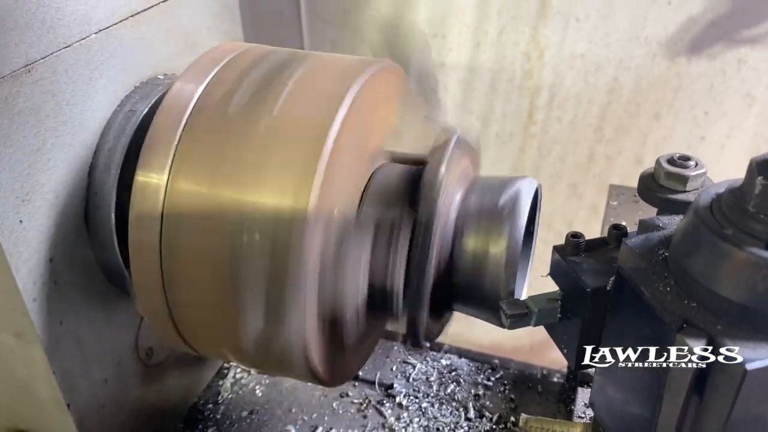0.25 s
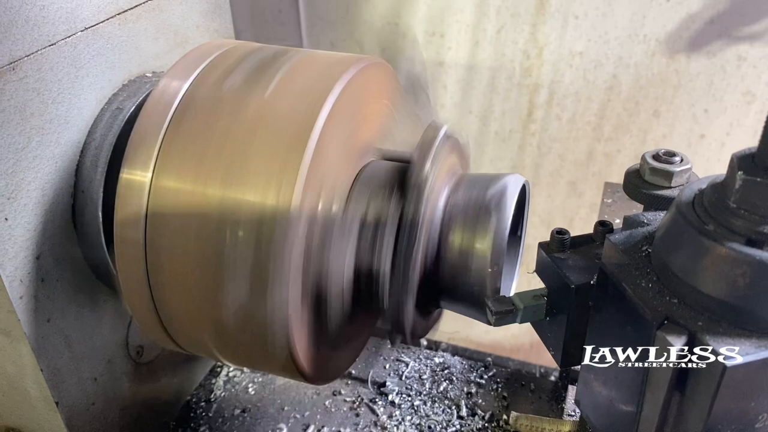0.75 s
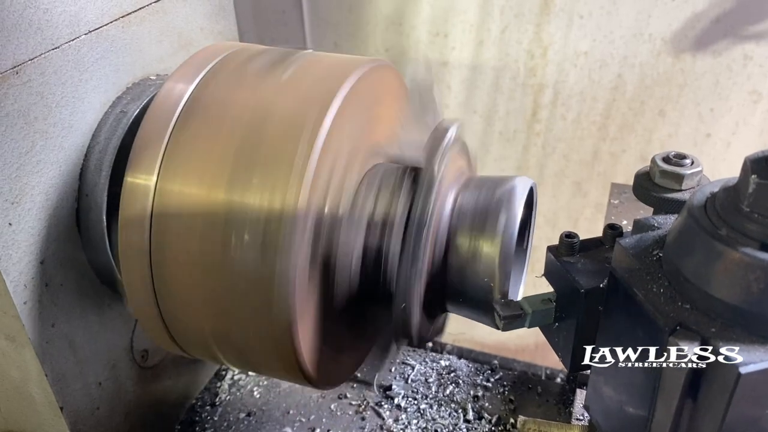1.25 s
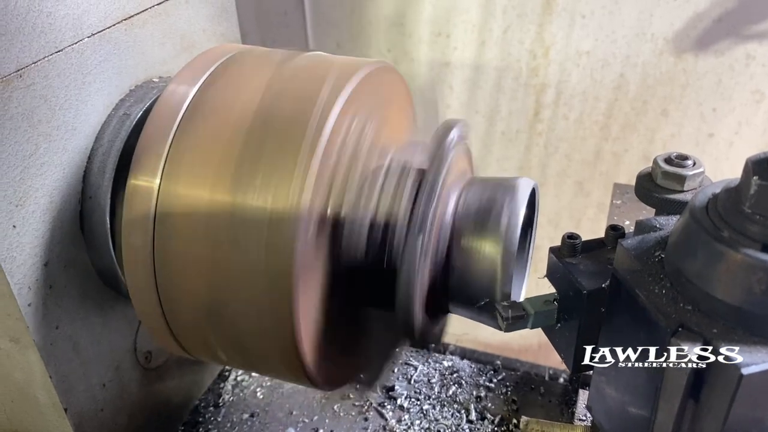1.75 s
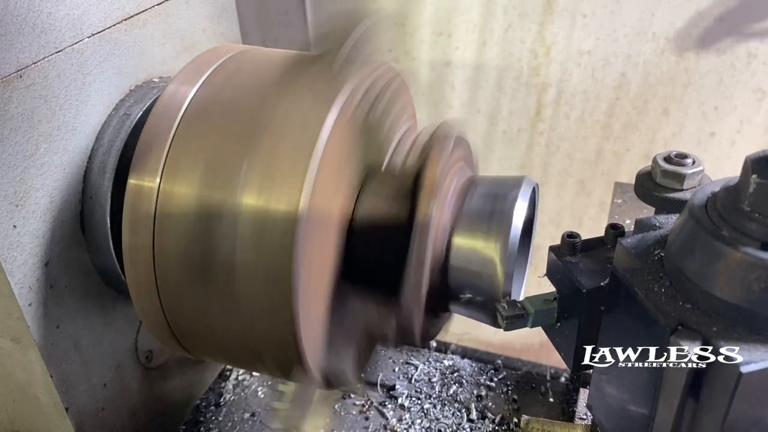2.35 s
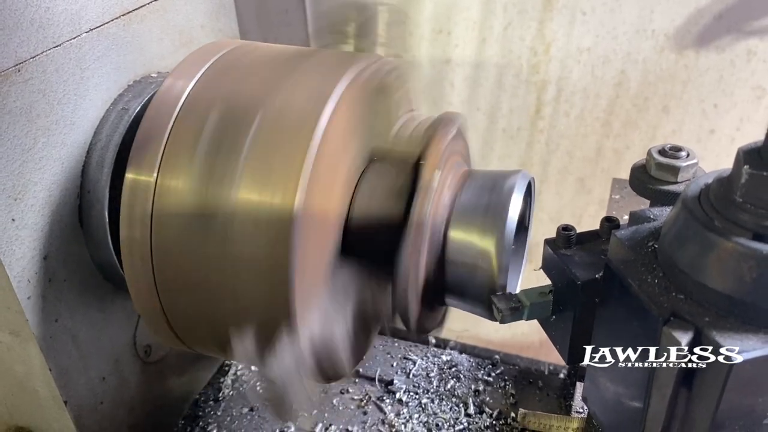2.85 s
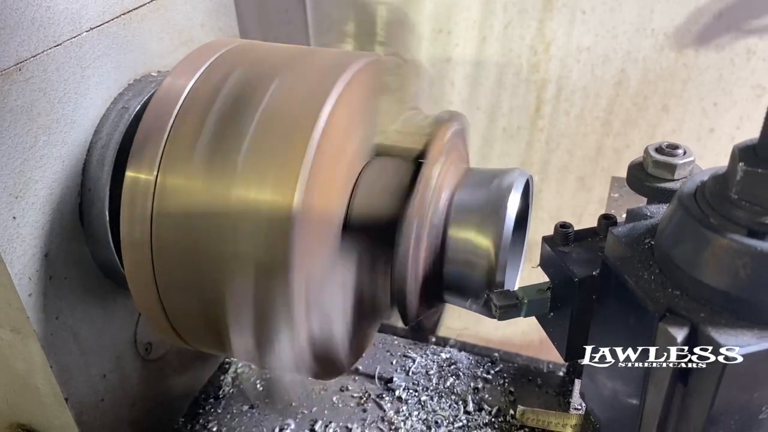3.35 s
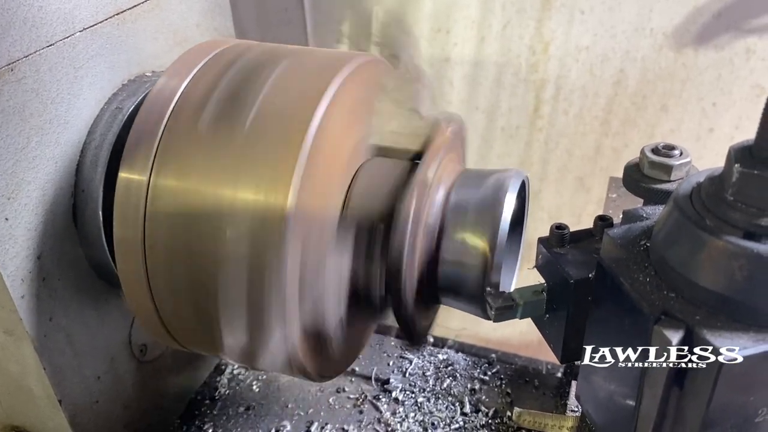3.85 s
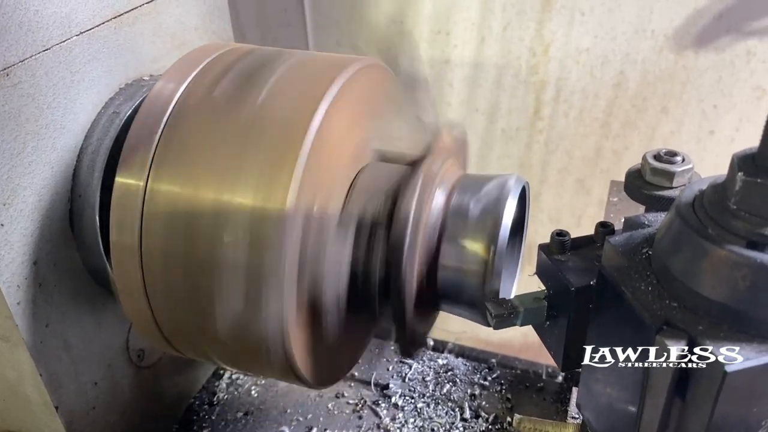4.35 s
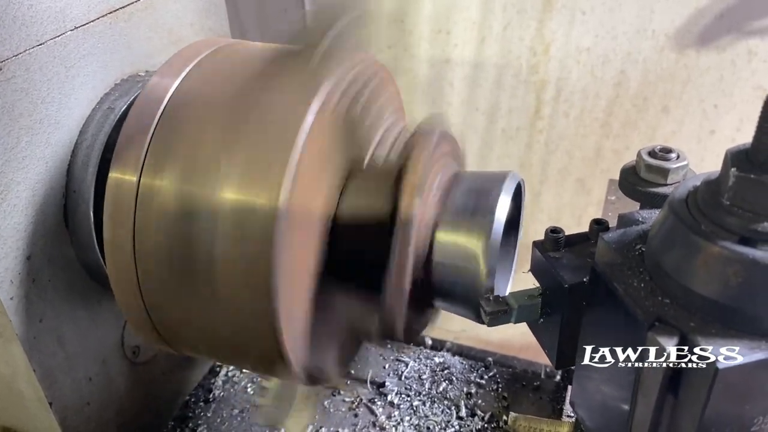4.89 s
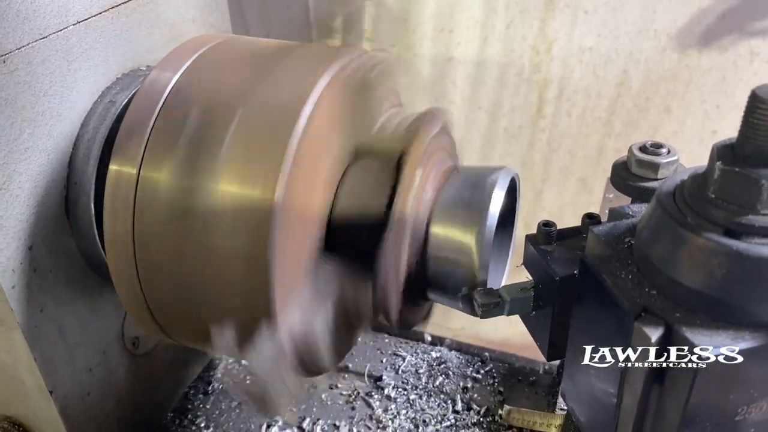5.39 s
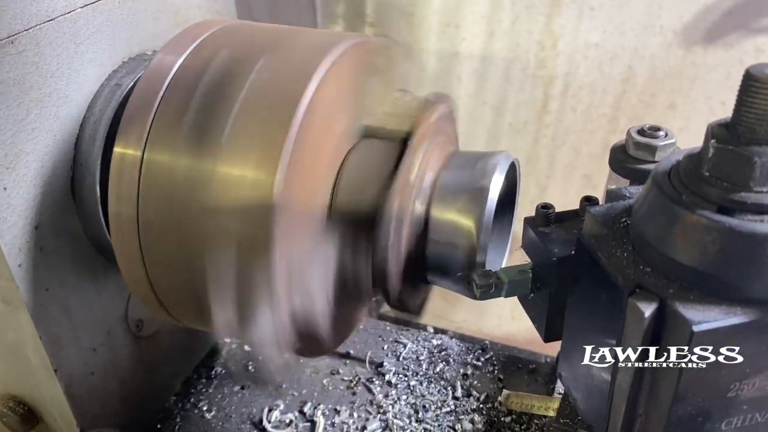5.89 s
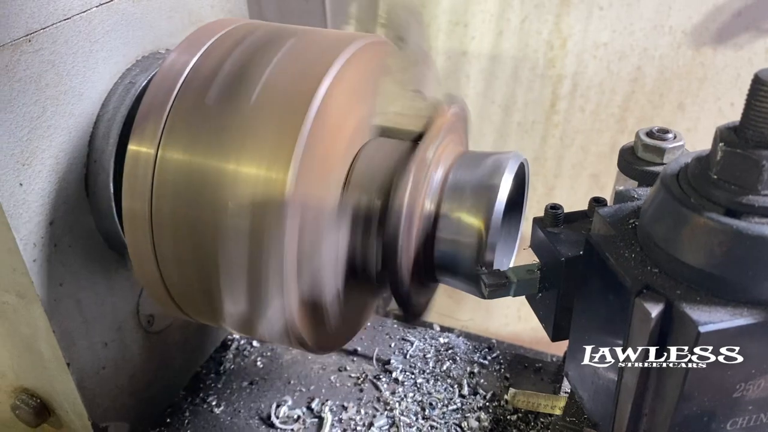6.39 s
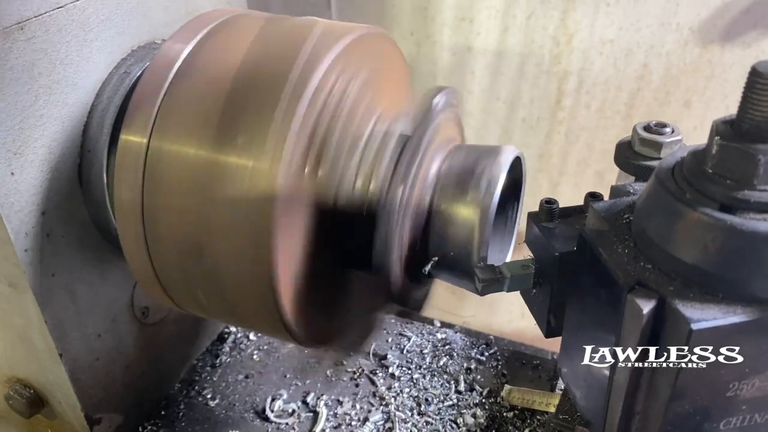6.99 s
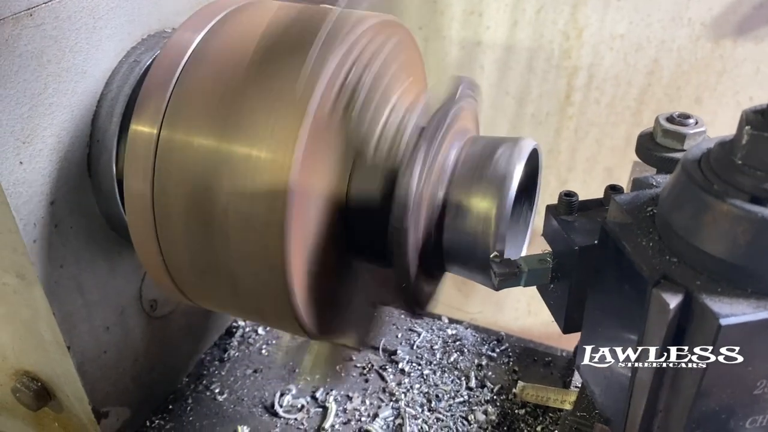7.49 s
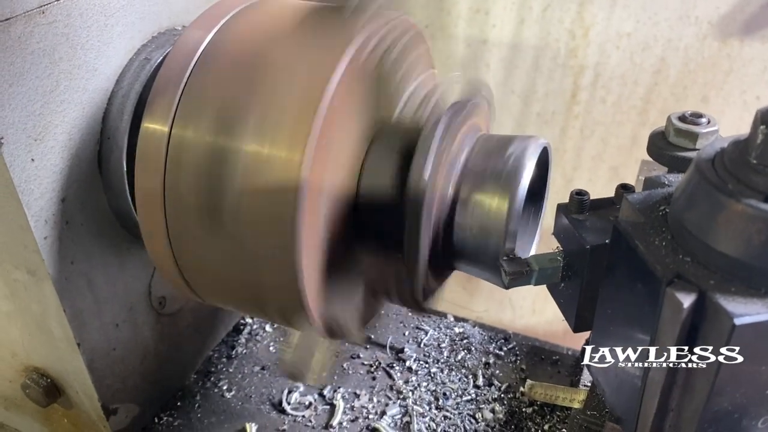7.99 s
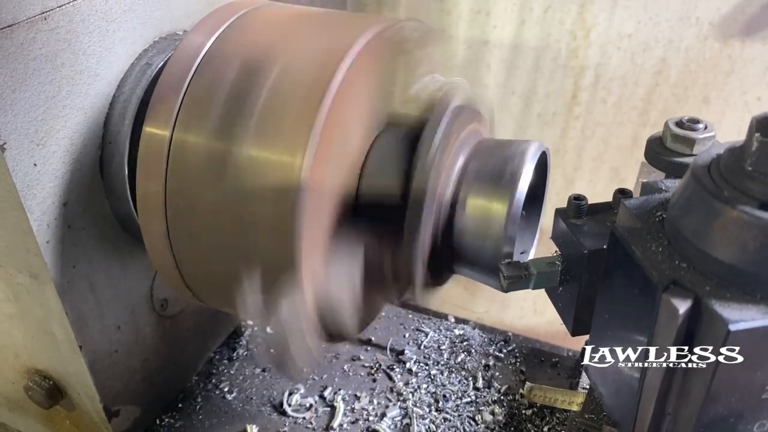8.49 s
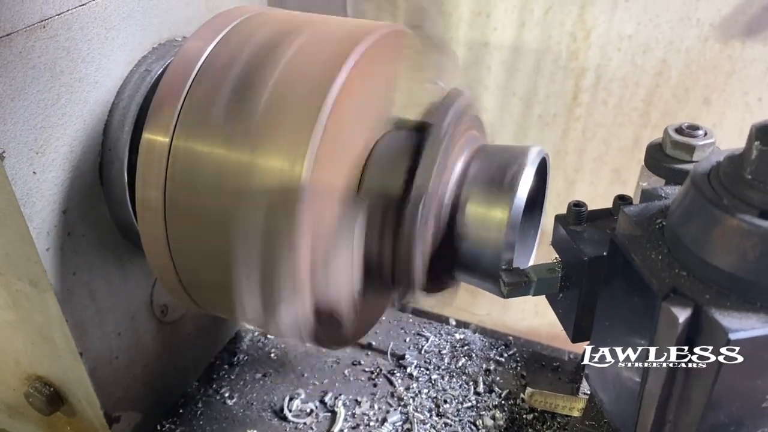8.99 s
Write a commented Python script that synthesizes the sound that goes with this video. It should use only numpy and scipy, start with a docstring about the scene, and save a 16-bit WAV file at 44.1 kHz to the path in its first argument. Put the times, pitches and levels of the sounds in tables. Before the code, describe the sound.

Fast, even pulses of high squealing come from a lathe tool cutting an out-of-round steel part, heard from very near with little workshop echo. Each pulse comes with a thud and a gritty tick of breaking chips, over a steady gear whirr. Soft air rumble buffets the microphone for a few seconds early on. The squeal turns faint toward the end, leaving the rhythmic ticking and the running machine.

```python
"""A lathe turns an out-of-round steel flange, close to the microphone, in a workshop.
Once a turn the high side runs into the tool: the bed thuds, the tool post knocks, chips crunch off
and the tool chatters at its own resonance, a squeal that weakens near the end.
The headstock gears whirr beneath, and for a while the chuck's draught buffets the microphone."""
import sys
import numpy as np
from scipy import signal
from scipy.fft import rfft, irfft
from scipy.io import wavfile

SR = 44100
rng = np.random.default_rng(int(sys.argv[2]) if len(sys.argv) > 2 else 0)


def wav_out(sig):
    """Save sig, one row per channel (or a flat mono array), as 16-bit PCM at SR to the path in sys.argv[1]."""
    wavfile.write(sys.argv[1], SR, np.round(np.clip(np.atleast_2d(sig).T, -1, 1) * 32767).astype(np.int16))


N = 407484
TIME = np.arange(N) / SR
# The high side of the work strikes the tool once a turn; the spindle slows very slightly.
FIRST_STRIKE_S, TURN_S, SLOWING_S_PER_TURN = .144, .168707, .00001832
TURNS = np.arange(-1, 54)
STRIKE_TIMES = FIRST_STRIKE_S + TURN_S * TURNS + SLOWING_S_PER_TURN * TURNS ** 2 / 2


def amp(db):
    return 10 ** (np.asarray(db) / 20)


def unit(x):
    return x / np.sqrt(np.mean(x ** 2) + 1e-20)


def add(mix, s, sound):
    """Mixes a sound in at s seconds."""
    part = mix[max(round(s * SR), 0):][:len(sound)]
    part += sound[:len(part)]


def filtered(x, points):
    """Filters x by a curve of (Hz, dB) points."""
    hz, db = np.transpose(points)
    f = np.fft.rfftfreq(N, 1 / SR)
    return irfft(rfft(x) * amp(np.interp(np.log(f + 1), np.log(hz), db)), N)


def colour(x, points):
    """Gives x a spectrum, at unit rms."""
    return unit(filtered(x, points))


def wander(hz):
    """Smooth random motion up to about hz, unit rms."""
    f = np.fft.rfftfreq(N, 1 / SR)
    return unit(irfft(rfft(rng.standard_normal(N)) * np.exp(-(f / hz) ** 2), N))


def wavering(hz, spread_hz, rate_hz):
    """A sine whose pitch strays around hz, unit rms."""
    return np.sqrt(2) * np.sin(2 * np.pi * np.cumsum(hz + spread_hz * wander(rate_hz)) / SR)


def resonate(x, hz, width):
    """One resonance, at unit rms."""
    pole = np.exp((2j * np.pi * hz - np.pi * width) / SR)
    return unit(signal.lfilter([1], [1, -pole], x).real)


def burst(t, rise, hold, fade):
    """Swells over rise seconds, lasts until hold, then dies away."""
    return np.clip(t / rise, 0, 1) ** 2 * np.exp(-np.maximum(t - hold, 0) / fade)


def grit(per_s, spread_db):
    """Tiny random clicks of uneven size."""
    sizes = amp(spread_db * np.minimum(rng.exponential(1, N), 4))
    return rng.standard_normal(N) * sizes * (rng.random(N) < per_s / SR)


def last_strike(s):
    """When the pass under way at s seconds began."""
    return STRIKE_TIMES[np.searchsorted(STRIKE_TIMES, s, side="right") - 1]


# Load on the machine. Each row: time in seconds, gear level in dB, rubbing level in dB.
LOAD = [(0, -51.5, -55), (.7, -54, -57.5), (1.4, -52, -56), (2.2, -51.5, -55.5), (3.3, -51.5, -55),
        (4.9, -50.5, -51.5), (5.4, -50.5, -52.5), (6.3, -49, -51), (6.6, -50, -52), (7.7, -48, -50),
        (8.4, -48, -50), (9.2, -46, -51.5)]
# Spectra of the headstock and the rubbing tool. Each row: frequency in Hz, relative level in dB.
WHIRR = [(28, -46), (60, -11.5), (130, 0), (235, -8), (300, 4), (440, -13), (700, -13), (1080, -10.5),
         (1720, -22), (2600, -14.5), (3150, -27.5), (4000, -14.5), (7000, -20.5), (15800, -28)]
RUB = [(500, -8), (2600, 6), (3200, -2), (3900, 6.5), (5300, 3.5), (7200, -46), (8000, 3.5), (9300, -23.5),
       (10200, 1), (10900, -19), (12500, -2), (15800, -5)]
# Gearbox casing resonances. Each row: frequency in Hz, width in Hz, relative level in dB.
CASING = [(1418, 22, 0), (1521.5, 11.5, 3), (2265, 63, 7), (2327, 76, 2.5), (4146, 13, -1.5)]
# Gear and bearing whine. Each row: pitch in Hz, level at average load in dB.
WHINE = [(167, -66.5), (210, -63.5), (291, -59), (1131, -71), (1497, -60), (2261, -59), (3540, -67.5)]


def headstock(mesh):
    """Gear teeth pulse a whirr and ring the casing; the tool rubs all the way round."""
    s, gear_db, rub_db = np.transpose(LOAD)
    gear, rub = amp(np.interp(TIME, s, gear_db)), amp(np.interp(TIME, s, rub_db))
    teeth = 1 + .3 * np.cos(mesh)
    whirr = colour(teeth * grit(per_s=7000, spread_db=0), WHIRR)
    casing = sum(amp(db) * resonate(teeth * rng.standard_normal(N), hz, width)
                 for hz, width, db in CASING)
    rubbing = colour(rng.standard_normal(N), RUB)
    # speed jitter smears the high lines most
    whine = sum(amp(db) * wavering(hz, spread_hz=3 + hz / 380, rate_hz=30) for hz, db in WHINE)
    return gear * (whirr + amp(-2.5) * unit(casing)) + rub * rubbing + whine * unit(gear)


# The edge grabs on entering the cut. Each row: start in seconds, swing in dB.
CHIRPS = [(0.151, -23.0), (0.321, -25.5), (0.491, -25), (0.66, -27.5), (0.826, -22.5), (0.991, -27.0),
          (1.158, -25), (1.336, -34), (1.503, -21.5), (1.664, -28.0), (1.831, -28), (2.01, -25.5),
          (2.181, -35), (2.351, -33.5), (2.518, -28.5), (2.7, -22), (2.85, -36.5), (3.033, -30.5),
          (3.198, -23), (3.37, -22), (3.539, -25.5), (3.704, -25.5), (3.864, -31.5), (4.036, -31),
          (4.219, -16), (4.389, -21.5), (4.558, -16), (4.726, -26.5), (4.892, -18), (5.074, -25.0),
          (5.239, -22), (5.399, -27.5), (5.552, -37.5), (5.741, -25), (5.912, -24.5), (6.083, -19),
          (6.228, -37), (6.413, -22.0), (6.582, -20), (6.75, -21), (6.917, -21), (7.092, -18.5),
          (7.263, -19), (7.437, -28.0), (7.603, -34.5), (7.773, -42), (7.923, -40), (8.092, -42),
          (8.263, -37.0), (8.433, -29), (8.605, -34), (8.773, -30), (8.944, -32.5), (9.114, -24.5)]
# One bout of chatter a turn. Each row: start in seconds, length in seconds, opening swing in dB,
# swing of the flare on leaving the cut in dB.
SQUEALS = [(0.0, 0.07, -22.0, -36.5), (0.171, 0.051, -21.5, -38), (0.342, 0.066, -21.0, -54),
           (0.52, 0.053, -19.5, -42.0), (0.685, 0.061, -19.5, -31.5), (0.863, 0.013, -21.5, -34),
           (0.987, 0.097, -27.5, -36), (1.156, 0.1, -27.0, -31.5), (1.343, 0.083, -22.5, -28),
           (1.525, 0.051, -26.5, -52.0), (1.668, 0.066, -24.5, -47), (1.837, 0.0198, -21.5, -37),
           (2.031, 0.016, -21.0, -48), (2.19, 0.011, -23, -49), (2.371, 0.025, -27.5, -49),
           (2.525, 0.054, -21.5, -30.0), (2.686, 0.049, -24.5, -35.5), (2.865, 0.061, -24.0, -39),
           (3.04, 0.037, -24.5, -36.5), (3.184, 0.053, -28.0, -53), (3.364, 0.037, -24.5, -46),
           (3.536, 0.041, -22.5, -62), (3.717, 0.044, -21.0, -42), (3.871, 0.05, -25.5, -41.5),
           (4.04, 0.041, -21.5, -25), (4.231, 0.026, -19.5, -27.0), (4.384, 0.086, -24.0, -37),
           (4.54, 0.07, -21.0, -32.5), (4.744, 0.025, -19.5, -25.5), (4.915, 0.018, -25.0, -33.5),
           (5.091, 0.0167, -24, -33.0), (5.252, 0.031, -22, -29.5), (5.405, 0.039, -18.5, -23),
           (5.591, 0.028, -33.0, -21), (5.77, 0.049, -23, -34.5), (5.915, 0.064, -22, -28),
           (6.076, 0.024, -29.5, -34), (6.255, 0.026, -29.5, -44), (6.405, 0.058, -21.5, -29.5),
           (6.574, 0.06, -24.5, -24.5), (6.744, 0.083, -25.5, -22.0), (6.915, 0.034, -21, -35.5),
           (7.089, 0.038, -30.5, -35), (7.263, 0.047, -25, -23.5), (7.431, 0.037, -31.5, -25.5),
           (7.608, 0.037, -30.0, -33.5), (7.78, 0.034, -41.0, -52), (7.936, 0.036, -48.5, -56),
           (8.138, 0.017, -36.5, -60), (8.28, 0.02, -42.5, -62), (8.439, 0.019, -38, -48),
           (8.618, 0.016, -44, -45), (8.788, 0.016, -46, -50), (8.953, 0.019, -42, -59)]
# The chatter mode as the tool feeds along. Each row: time in seconds, base pitch in Hz.
CHATTER_HZ = [(0, 6115), (.7, 6130), (1.1, 6180), (2.5, 6220), (4, 6215), (5.5, 6212), (7, 6200),
              (9.2, 6225)]
# Cutting force bends the pitch. Each row: time after the strike in seconds, shift in Hz.
BEND = [(0, 110), (.01, 60), (.023, -15), (.04, 0), (.06, 20), (.078, 20), (.1, -45), (.115, -90)]
SAG_DB_PER_S, SIMMER_DB = 61.5, -16  # a squeal sags; a weaker simmer lasts through the cut
LEAVE_S, CUT_S = .074, .087  # from the strike to the leaving flare, and to the end of the cut
FLAT_HZ_PER_DB, USUAL_DB = 5, -27  # a swing wider than usual runs flat


def chatter():
    """Level and pitch of the tool's swing: each turn it grabs, simmers, squeals and flares."""
    t = np.arange(SR // 5) / SR
    power = np.zeros(N)
    for s, db in CHIRPS:
        add(power, s, (amp(db) * burst(t, rise=.00401, hold=.01, fade=.004)) ** 2)
    for s, length, db, leave_db in SQUEALS:
        strike = last_strike(s)
        bout = amp(db - SAG_DB_PER_S * t) * burst(t, rise=.01, hold=length, fade=.007)
        simmer = amp(db + SIMMER_DB) * burst(t, rise=.0046, hold=CUT_S, fade=.0041)
        flare = amp(leave_db) * burst(t, rise=.016, hold=.031, fade=.0057)
        add(power, s, bout ** 2)
        add(power, strike, simmer ** 2)
        add(power, strike + LEAVE_S, flare ** 2)
    swing = np.sqrt(power)
    flat = FLAT_HZ_PER_DB * np.maximum(20 * np.log10(swing + 1e-9) - USUAL_DB, -10)
    bend = np.interp(TIME - last_strike(TIME), *np.transpose(BEND))
    return swing, np.interp(TIME, *np.transpose(CHATTER_HZ)) + bend - flat


# How harshly the edge bites. Each row: time in seconds, octave gain in dB, sizzle gain in dB.
BITE = [(0, -14, -21.5), (.35, -4, -24), (.8, -11, -22), (1.2, -13, -22), (3, -15, -35), (5, -16, -30),
        (6.8, -10.5, -27.5), (7.6, -10.5, -23), (9.2, -12, -26)]
# The tool post's response around the chatter mode. Each row: frequency in Hz, gain in dB.
TOOL_BAND = [(5300, -25), (5750, -8), (5950, 0), (6450, 0), (6750, -6), (7500, -20)]
# Spectrum of the tearing chip. Each row: frequency in Hz, relative level in dB.
SIZZLE = [(3600, -29), (5100, -3.5), (6900, -9), (9300, -24), (10300, -7.5), (10850, -14), (11400, -14),
          (12300, -11), (13000, -19), (14200, -8), (15800, -23)]
WIDEST_DB, HARSH_DB, HARSH_POWER = -15, -22, .6  # the swing's limit, where it turns harsh, how fast


def squeal(mesh):
    """The tool chatters at its own resonance, shaken by the gear teeth and the uneven chip."""
    swing, pitch = chatter()
    shake = .55 * np.cos(mesh) + wander(150)
    phase = 2 * np.pi * np.cumsum(pitch - 19 * shake + 24 * wander(45) + 18 * wander(450)) / SR
    # a wide swing saturates and is steadier than a faint one
    flutter_db = 1.7 + 2.4 * np.exp(-swing / .03)
    level = swing * amp(flutter_db * shake + .6 * wander(450))
    level = level / (1 + (level / amp(WIDEST_DB)) ** 4) ** .25
    tone = filtered(level * np.sin(phase), TOOL_BAND)
    # a hard swing is lopsided, so the octave grows faster than the tone
    s, octave_db, sizzle_db = np.transpose(BITE)
    harsh = level * (np.sqrt(level * swing) / amp(HARSH_DB)) ** HARSH_POWER
    octave = harsh * amp(np.interp(TIME, s, octave_db) + 3.6 * wander(160))
    octave *= np.sin(2 * phase + .25 * wander(760))
    # the chip tears only where the edge bites hard
    sizzle = harsh * amp(np.interp(TIME, s, sizzle_db) + 2 * wander(60))
    sizzle *= colour(grit(per_s=9000, spread_db=1.5), SIZZLE)
    return np.sqrt(2) * (tone + octave) + sizzle


def sputter(against_rub_db, spread_db):
    """The rubbing edge sputters faintly on the chatter mode, heard between the squeals."""
    s, _, rub_db = np.transpose(LOAD)
    level = amp(np.interp(TIME, s, rub_db) + against_rub_db + spread_db * np.minimum(wander(44), 2))
    return level * colour(resonate(rng.standard_normal(N), hz=6290, width=120), TOOL_BAND)


# How hard the work meets the tool. Each row: time in seconds, then thud, knock, crunch, chink in dB.
FORCE = [(0.2, -41.5, -51.5, -48, -61), (1.15, -38.5, -45.5, -47, -55), (1.6, -34.5, -46.5, -44.5, -37),
         (2.2, -38, -47, -46, -58), (2.85, -39, -45.5, -46, -38), (3.35, -38.5, -45.5, -44, -42),
         (3.75, -38, -47, -46, -54), (5.0, -35.5, -46, -47.5, -47), (6.1, -43, -47.5, -47.5, -44),
         (7.0, -38, -49, -44, -52), (7.7, -41, -43, -44.5, -35), (8.201, -37.5, -45.5, -43.5, -36),
         (9.1, -46, -43.5, -43, -36.5)]
# Modes of the machine bed. Each row: pitch in Hz, relative level in dB, seconds to fall by 60 dB.
BED = [(142.9, -8.5, 0.31), (187.7, -9.5, 0.23), (283.5, 3.5, 0.21), (323.4, -2.5, 0.24)]
# Entry into the cut. Each row: time in seconds, length of the crunch in seconds.
ENTRY = [(0, 0.011), (6.5, 0.016), (7.7, 0.01), (9.2, .011)]
# Spectra of the struck tool post and guards, and of steel chips breaking off.
# Each row: frequency in Hz, relative level in dB.
KNOCK = [(100, -20), (190, 0), (380, -2), (450, -1.5), (540, 1.5), (720, -7.5), (1050, -6.5), (1300, -11),
         (1530, 3.5), (1720, -6.5), (2450, -4), (3200, -14), (4200, -21), (9000, -16)]
CRUNCH = [(2500, -68), (4100, -7), (5000, 2), (5600, 0.5), (6300, 0), (7000, -5), (9400, -22.5),
          (10200, -11.5), (10900, -12.5), (12400, -18.5), (13400, -14), (15800, -18)]


def strikes():
    """Each entry into the cut cracks off chips, knocks the tool post and rings the heavy bed."""
    t = np.arange(SR // 3) / SR
    thud, knock, crunch, chink = np.zeros((4, N))
    at, *force = np.transpose(FORCE)
    for s in STRIKE_TIMES[STRIKE_TIMES > 0]:
        lag, scatter_db, *detune = rng.standard_normal(len(BED) + 2)
        thud_db, knock_db, crunch_db, chink_db = (np.interp(s, at, db) + scatter_db for db in force)
        ring = sum(amp(db - 60 * t / t60) * np.sin(2 * np.pi * hz * (1 + .016 * d) * t)
                   for (hz, db, t60), d in zip(BED, detune))
        add(thud, s + .00506, amp(thud_db) * ring * np.minimum(t / .026, 1) ** 2)
        add(knock, s - .002, amp(knock_db) * burst(t, rise=.0046, hold=.014, fade=.038))
        # a brief entry packs its energy into a sharper crack
        entry = np.interp(s, *np.transpose(ENTRY))
        crack = np.sqrt(.022 / entry) * burst(t, rise=.41 * entry, hold=entry, fade=entry)
        add(crunch, s - .001, amp(crunch_db) * crack)
        add(chink, s + .0018 * abs(lag), amp(chink_db) * burst(t, rise=.0019, hold=.0032, fade=.005))
    knock *= colour(grit(per_s=4000, spread_db=1.5), KNOCK)
    crunch *= colour(grit(per_s=4400, spread_db=1), CRUNCH) * amp(1.5 * wander(90))
    chink *= wavering(5000, spread_hz=130, rate_hz=150)  # a lower mode of the tool, at first contact
    return thud + knock + crunch + chink


# Gusts reaching the microphone. Each row: start in seconds, length in seconds, rumble level in dB,
# flutter level in dB.
GUSTS = [(1.386, 0.28, -44.5, -45), (1.764, 0.75, -55, -51.5), (2.485, 0.35, -47.5, -45),
         (2.78, 0.41, -58, -43.5), (3.28, 0.11, -58, -56), (3.56, 0.12, -59, -43.5),
         (3.914, 0.167, -59, -47), (4.16, 0.39, -66, -51.5), (4.56, .15, -63, -56)]
# Spectra of a gust's deep rumble and its flutter. Each row: frequency in Hz, relative level in dB.
RUMBLE = [(20, -34), (38, -28), (53, -7), (77, 0), (100, -11), (200, -30), (600, -60)]
FLUTTER = [(50, -33), (95, -9.5), (130, -1.5), (200, -2.5), (300, -25), (600, -31), (2000, -53)]


def draught():
    """Air thrown by the chuck buffets the nearby microphone in low, lumpy gusts."""
    deep, flutter = np.zeros((2, N))
    for s, length, deep_db, flutter_db in GUSTS:
        gust = burst(TIME - s, rise=.07, hold=length, fade=.11)
        deep += amp(deep_db) * gust
        flutter += amp(flutter_db) * gust
    lumps = amp(1.5 * wander(14))
    deep *= colour(rng.standard_normal(N), RUMBLE)
    flutter *= colour(rng.standard_normal(N), FLUTTER)
    return lumps * (deep + flutter)


# Faint high squeaks at the tool. Each row: start in seconds, length in seconds, level in dB.
SQUEAKS = [(2.175, .03, -50), (2.342, .025, -51), (2.513, .025, -49)]


def squeaks():
    """A higher mode of the tool rings briefly on three turns running."""
    t = np.arange(SR // 10) / SR
    level = np.zeros(N)
    for s, length, db in SQUEAKS:
        add(level, s, amp(db) * burst(t, rise=.0036, hold=length, fade=.009))
    return level * wavering(7634, spread_hz=25, rate_hz=150)


def workshop(x, t60, wet_db):
    """A short wash of reflections off the guards and walls, faint this close to the tool."""
    t = np.arange(SR // 2) / SR
    taps = rng.choice([-1, 1], len(t)) * (rng.random(len(t)) < .1) * (t > .004)
    tail = taps * amp(-60 * t / t60)
    return x + amp(wet_db) * signal.fftconvolve(x, tail / np.linalg.norm(tail))[:N]


def scene():
    """The lathe from close by, in mono; one gear mesh drives the whirr and shakes the squeal."""
    mesh_hz = 107.4 + .45 * wander(2.9)
    mesh = 2 * np.pi * np.cumsum(mesh_hz) / SR
    cutting = strikes() + squeal(mesh) + sputter(against_rub_db=-10.5, spread_db=7) + squeaks()
    return (workshop(cutting, t60=.17, wet_db=-19.5) + headstock(mesh) + draught())[None]


# The microphone's bass roll-off. Each row: frequency in Hz, gain in dB.
MIC = [(22, -20), (36, -8), (52, 0), (100, 0)]
TREBLE_LIMIT_HZ = 15780


def record(dry):
    """The microphone thins the deepest bass; a steep low-pass cuts the highest treble."""
    low_pass = signal.firwin(801, TREBLE_LIMIT_HZ, window=("kaiser", 9), fs=SR)
    return signal.oaconvolve(filtered(dry, MIC), low_pass[None], "same")


dry = scene()
out = record(dry)
wav_out(out)
```